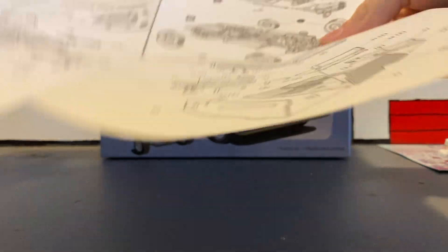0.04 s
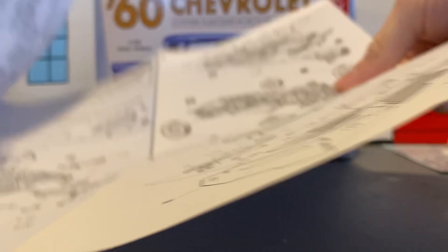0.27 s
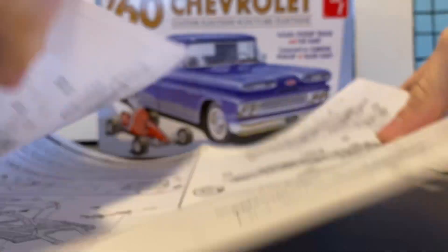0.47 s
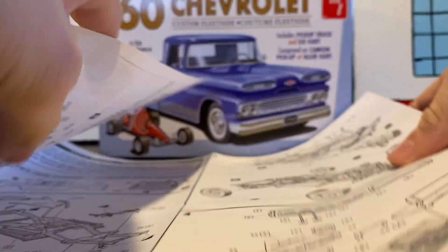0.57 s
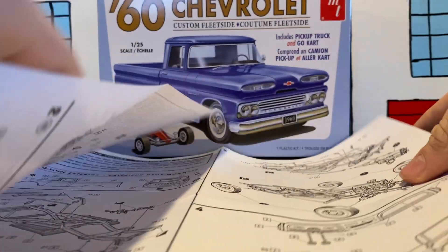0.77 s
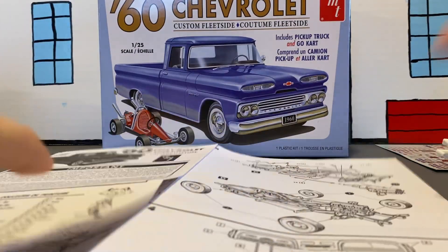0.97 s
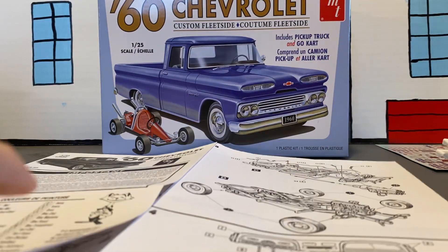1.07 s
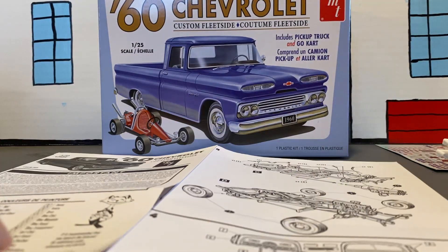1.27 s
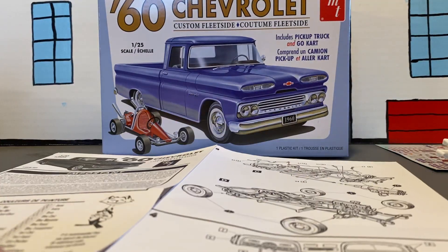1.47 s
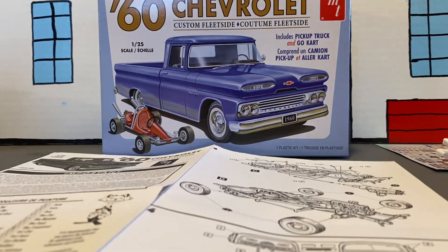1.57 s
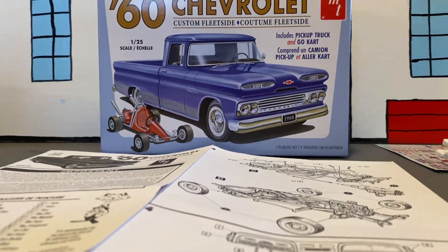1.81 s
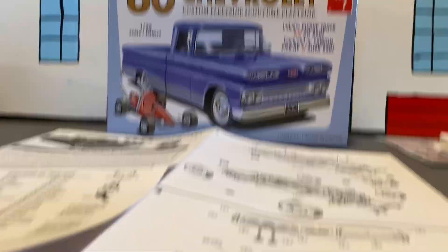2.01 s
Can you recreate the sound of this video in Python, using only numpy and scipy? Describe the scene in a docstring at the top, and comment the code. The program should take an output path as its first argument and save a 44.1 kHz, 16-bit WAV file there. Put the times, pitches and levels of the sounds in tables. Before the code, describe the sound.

Paper rustles and flaps loudly as it is opened and laid down, then settles with small crackles

```python
"""A folded paper sheet is opened by hand and laid on a table, close to the microphone, in a small room.
From the start its leaves hiss by stick-slip friction and flutter as wrinkles pop, over a quiet background;
leaves soon flap with dispersive thumps and slaps, then buckling patches snap as short decaying modes.
Bowed panels next sing gliding notes, and edges whip taut or strike the table with falling bending waves.
Later the crease ticks in tiny noise bursts as it is smoothed flat, among the last flaps and thumps."""
import sys
import numpy as np
from scipy import signal
from scipy.fft import rfft, irfft
from scipy.io import wavfile

SR = 44100
rng = np.random.default_rng(int(sys.argv[2]) if len(sys.argv) > 2 else 0)


def transcribe(signal):
    """Save signal, clipped to [-1, 1], as a 16-bit WAV file at the path in sys.argv[1]."""
    frames = np.atleast_2d(signal).T
    limited = np.clip(frames, -1, 1)
    pcm = np.round(limited * 32767).astype(np.int16)
    wavfile.write(sys.argv[1], SR, pcm)


N = 90404
TIME = np.arange(N) / SR
HZ = np.fft.rfftfreq(N, 1 / SR)
EDGE_HZ = 16300  # upper band limit


def amp(db):
    """Logarithmic level: decibels become an amplitude ratio."""
    return 10 ** (np.asarray(db) / 20)


def unit(x):
    """Normalization: the signal is scaled to rms 1."""
    return x / np.sqrt(np.mean(x ** 2) + 1e-20)


def read(points):
    """Spectral interpolation: a table over frequency is joined on a logarithmic axis."""
    hz, value = np.transpose(points)
    return np.interp(np.log(HZ + 1), np.log(hz + 1), value)


def level(points, axis=1):
    """Amplitude envelope: one dB column of a table over time becomes a gain."""
    rows = np.array(points)
    return amp(np.interp(TIME, rows[:, 0], rows[:, axis]))


def pan(db):
    """Interaural level difference: left and right gains, half the dB each way."""
    return amp(np.array([[.5], [-.5]]) * db)


def add(mix, start_s, sound):
    """Superposition: a stereo sound is added to the mix from a given time."""
    part = mix[:, max(round(start_s * SR), 0):][:, :sound.shape[1]]
    part += sound[:, :part.shape[1]]


def wander(size, hz):
    """Low-passed noise: a smooth random curve of rms 1, with hz as its corner frequency."""
    spectrum = rfft(rng.standard_normal(size))
    low_pass = 1 / (1 + (np.fft.rfftfreq(size, 1 / SR) / hz) ** 4)
    return unit(irfft(spectrum * low_pass, size))


def waver(hz, depth_db):
    """Random amplitude modulation: a soft-limited wander in dB becomes a gain of rms 1."""
    limited = 2 * np.tanh(wander(N, hz) / 2)
    return unit(amp(depth_db * limited))


def grains(per_s, spread_db, share):
    """Shot noise: two trains of uneven random impulses, whose power share is filled up by smooth noise."""
    size = amp(spread_db * np.minimum(rng.exponential(1, (2, N)), 4))
    sign = rng.choice([-1, 1], (2, N))
    occurs = rng.random((2, N)) < per_s / SR
    clicks = unit(size * sign * occurs)
    share = np.clip(share, 0, 1)
    return np.sqrt(share) * clicks + np.sqrt(1 - share) * rng.standard_normal((2, N))


# Likeness of the two microphone ports: (frequency [Hz], left-right correlation [0 to 1])
PORT_LIKENESS = [(60, 1), (150, 0.79), (300, 0.7), (700, 0.65), (1400, 0.25), (3000, 0.67), (6000, 0.57),
                 (9000, 1), (15000, 0.63)]
# Phase between the ports: (frequency [Hz], lead of the left port [rad])
PORT_PHASE = [(0, -0.5), (250, -0.17), (900, 1.54), (1800, 0.5), (3500, 0), (7400, 0.26), (8700, -3),
              (11600, -6.5), (15000, -11)]
# Balance at full lean: (frequency [Hz], left-right level difference [dB])
PORT_LEAN = [(60, 8), (200, 1.5), (700, 6.5), (1300, 2.5), (2300, 3), (4500, 5.5), (8000, 0.5),
             (16000, -0.5)]


def radiate(drive, colour, lean=0):
    """Partial coherence: two drives are coloured and made partly alike at the two ports, at rms 1."""
    first, second = rfft(drive)
    same = np.clip(read(PORT_LIKENESS), -1, 1)
    mid, side = first * np.sqrt(1 + same), second * np.sqrt(1 - same)
    right = (mid - side) * np.exp(-1j * read(PORT_PHASE))
    ports = np.array([mid + side, right])
    return unit(irfft(ports * amp(read(colour)) * pan(lean * read(PORT_LEAN)), N))


HAND_CENTRED_FROM_S = 1.51


def at_hand(drive, colour):
    """Source localization: level differences set the hand's sound on the left first, then in the middle."""
    left = TIME < HAND_CENTRED_FROM_S
    return np.where(left, radiate(drive, colour, lean=0.91), radiate(drive, colour))


# Leaves sliding over each other: (time [s], level before SLIDE_GAIN_DB [dB])
SLIDE_LEVEL = [(0, -57), (.03, -50), (.115, -49), (.135, -61), (.152, -51.5), (.19, -57), (.199, -44),
               (.222, -58), (.24, -48.5), (.262, -52.5), (.278, -48.5), (.295, -53.5), (.335, -49),
               (.352, -43), (.41, -40.5), (.432, -37.5), (.465, -43.5), (.65, -43.5), (.683, -40.5),
               (.703, -35.5), (.72, -44.5), (.75, -37), (.765, -42.5), (.84, -41), (.89, -44.5),
               (.925, -36.5), (.955, -57), (1.08, -61), (1.18, -65), (1.27, -58), (1.4, -58), (1.47, -55),
               (1.5, -50.5), (1.585, -60.5), (1.612, -49.5), (1.65, -44), (1.7, -57.5), (1.722, -46),
               (1.77, -68.5), (1.84, -65.5), (1.88, -54.5), (2.05, -59)]
# Relative spectrum of the hiss: (frequency [Hz], density [dB per Hz])
SLIDE_COLOUR = [(100, -66), (600, 5), (1300, -3), (2300, 5), (3300, 2.5), (5000, 1), (7500, 0.5),
                (10000, -3), (16000, -6)]
# Finest treble against the rest of the hiss: (time [s], relative level [dB])
FIZZ_LEVEL = [(0, -2.5), (.13, 0), (.25, 6), (.35, 4), (.48, -2.5), (.75, 2), (.92, -2.5), (1.02, 0),
              (1.35, -4.5), (1.52, -2), (1.61, 3), (1.66, -7.5), (1.9, -3.5), (2.05, 6.5)]
SLIDE_GAIN_DB, FIZZ_FROM_HZ = 2.5, 6000


def sliding():
    """Stick-slip friction: fibres catch and slip as paper rubs on paper; the fine fizz wavers on its own."""
    rub = grains(per_s=3500, spread_db=-1, share=1)
    coarse = irfft(rfft(rub) / (1 + (HZ / FIZZ_FROM_HZ) ** 8), N)
    fizz = (rub - coarse) * level(FIZZ_LEVEL) * waver(hz=54, depth_db=2.0)
    drive = coarse * waver(hz=100, depth_db=2.0) + fizz
    return amp(SLIDE_GAIN_DB) * level(SLIDE_LEVEL) * at_hand(drive, SLIDE_COLOUR)


# The sheet bending in the hands, levels before the two gains below:
# (time [s], flutter level [dB], level of the air it pushes [dB])
BEND_LEVELS = [(0, -44, -61), (.045, -56, -66), (.058, -40, -55), (.17, -46, -41), (.27, -44.5, -47.5),
               (.335, -45, -47), (.355, -33.5, -36), (.41, -41.5, -34), (.47, -42, -29), (.51, -33, -47),
               (.59, -45.5, -44), (.66, -45, -55), (.72, -33.5, -30), (.785, -43.5, -34), (.88, -48, -65),
               (.96, -43.5, -45), (1.02, -56, -38.5), (1.11, -70.5, -62), (1.26, -77, -70),
               (1.34, -61.5, -83), (1.53, -58.5, -53), (1.59, -52.5, -41.5), (1.64, -44.5, -44.5),
               (1.7, -51, -43), (1.76, -48.5, -45), (1.82, -64.5, -49), (1.86, -58, -70), (1.9, -60, -34.5),
               (1.97, -47.5, -49), (2.05, -87, -65)]
# Relative spectrum of the flutter: (frequency [Hz], density [dB per Hz])
FLUTTER_COLOUR = [(60, -26), (140, 2), (350, 1.5), (700, -3.5), (1100, -6.5), (1500, -10), (2200, -14.5),
                  (3200, -37), (6000, -69), (16000, -75)]
# Relative spectrum of the pushed air: (frequency [Hz], density [dB per Hz])
AIR_COLOUR = [(15, -57), (35, -26), (52, -7.5), (72, -0.5), (105, -7), (170, -15), (400, -35), (2000, -61)]
FLUTTER_GAIN_DB, AIR_GAIN_DB = -1.5, -3.5


def bending():
    """Impulsive and volume-flow radiation: wrinkles pop in the moving sheet, which also fans the air."""
    wrinkles = grains(per_s=900, spread_db=-1.5, share=0.94) * waver(hz=31, depth_db=3.0)
    flutter = amp(FLUTTER_GAIN_DB) * level(BEND_LEVELS) * at_hand(wrinkles, FLUTTER_COLOUR)
    pushed = radiate(rng.standard_normal((2, N)), AIR_COLOUR)
    return flutter + amp(AIR_GAIN_DB) * level(BEND_LEVELS, axis=2) * pushed


# Relative spectrum of the quiet background: (frequency [Hz], density [dB per Hz])
BACKGROUND_COLOUR = [(20, 7), (60, 4), (150, 20), (400, -42), (1200, 1), (2500, -10.5), (6000, -2),
                     (16000, -81)]
BACKGROUND_DB = -69.5


def background():
    """Stationary noise: a steady coloured random signal lies under the paper."""
    return amp(BACKGROUND_DB) * radiate(rng.standard_normal((2, N)), BACKGROUND_COLOUR)


# Leaves that flap or land: (time [s], thump level [dB], pitch the thump falls towards [Hz],
# slap level [dB], time until the slap fades [s], left-right difference of the slap [dB])
FLAPS = [(0.051, -59, 92, -42.5, 0.0094, 0), (0.209, -40.5, 99, -38.5, 0.0055, 2),
         (0.348, -46, 81, -45, 0.0066, 13), (0.388, -27, 57, -32, 0.017, 5),
         (0.444, -38, 76.6, -36.5, 0.0061, 7), (0.486, -47, 107, -32, 0.02, 9.5),
         (.628, -56, 101, -34, 0.011, 1.5), (0.693, -20.5, 71, -28.5, 0.022, 6),
         (0.738, -33, 69, -31, 0.0059, 9), (0.852, -33, 55.6, -33.5, 0.0046, 8),
         (0.922, -35, 59.3, -36, 0.0076, 9), (0.96, -32.5, 66.4, -48.5, 0.002, 21),
         (1.007, -39, 64, -55, 0.0025, 23), (1.2819, -38, 67, -38.5, 0.014, 9.5),
         (1.434, -43, 75, -64, 0.014, 10), (1.627, -42.5, 102, -42.5, 0.016, 3.5),
         (1.7233, -33, 104, -38, 0.0082, -0.5), (1.752, -36.5, 104, -50, 0.011, -8),
         (1.775, -42.5, 120, -59, 0.0038, -3), (1.879, -39.5, 78, -46, 0.0092, -4),
         (1.904, -42.5, 64, -50.5, 0.0048, 12), (1.96, -41, 51.4, -48.5, 0.0026, 11)]
# Relative spectrum of the slaps: (frequency [Hz], density [dB per Hz])
SLAP_COLOUR = [(60, 8), (180, -6.5), (400, 1), (750, -2), (1100, -8), (1500, -11), (2200, -5.5),
               (2900, -20.5), (4500, -27.5), (8000, -37.5), (16000, -33)]
SLAP_RISE_S, SLAP_FADE_S = 0.0015, 0.0061
THUMP_RISE_CYCLES, THUMP_FADE_CYCLES = 2.2, 1.11  # time constants in cycles of the table's pitch
THUMP_PAN_SHARE, THUMP_WANDER = .2, 0.26  # shares of the slap's left-right dB and of the pitch
GLIDE_HZ, GLIDE_S = 560.6, 0.004395  # height of the starting pitch above the last, time constant


def flaps():
    """Dispersion: bending waves arrive treble first, so each thump falls in pitch under a patter of contacts."""
    out, t = np.zeros((2, N)), np.arange(SR // 5) / SR
    patter = radiate(grains(per_s=2500, spread_db=3, share=0.83), SLAP_COLOUR)
    for start_s, thump_db, hz, slap_db, length_s, pan_db in FLAPS:
        swell = (1 - np.exp(-t * hz / THUMP_RISE_CYCLES)) * np.exp(-t * hz / THUMP_FADE_CYCLES)
        falling = hz + GLIDE_HZ * np.exp(-t / GLIDE_S)
        pitch = falling * (1 + THUMP_WANDER * wander(len(t), 2 * hz))
        thump = swell / swell.max() * np.sin(2 * np.pi * np.cumsum(pitch) / SR)
        add(out, start_s, amp(thump_db) * pan(THUMP_PAN_SHARE * pan_db) * thump)

        rise = np.clip((TIME - start_s) / SLAP_RISE_S, 0, 1)
        fade = np.exp(-np.maximum(TIME - start_s - length_s, 0) / SLAP_FADE_S)
        out += amp(slap_db) * pan(pan_db) * rise * fade * patter
    return out


# Buckling patches: (time [s], level before mode gains and envelope [dB], reference pitch [Hz],
# time to decay by 60 dB at full share [s], left-right difference [dB])
SNAPS = [(0.2081, -21, 2308, 0.025, 3.5), (0.3016, -26.5, 960, 0.019, -4), (0.3028, -30, 1595, 0.022, -2),
         (.3918, -26, 1000, 0.032, 6), (.3928, -21.5, 2150, 0.03, 2), (.479, -17.5, 2177, 0.036, 6),
         (.691, -28, 2640, 0.021, 6), (.7095, -27.5, 2200, 0.021, 14), (0.854, -24.5, 2500, 0.0063, -3),
         (1.004, -32.5, 2270, 0.015, 3), (1.531, -34.5, 1290, 0.0078, 0), (1.6113, -27, 1970, 0.014, 2),
         (1.6322, -32, 3040, 0.019, 10), (1.681, -30.5, 1800, 0.017, -2), (1.6922, -38, 1840, 0.013, -5),
         (1.724, -23, 1440, 0.0066, -10), (1.7238, -20.5, 3030, 0.0048, 12.5),
         (1.7401, -23.5, 1470, 0.0082, -4)]
# Modes of a patch: (multiple of the pitch [ratio], relative level [dB], share of the decay time [ratio])
SNAP_MODES = [(.47, -15.5, 0.52), (0.904, -13, 1), (0.999, -6.5, 1), (1.149, -14.5, 0.79),
              (1.41, -12.5, 0.56)]
SNAP_RISE_SHARE = .06  # rise time constant as a share of the table's decay time
SNAP_WANDER, SNAP_WANDER_HZ = 0.076, 1210  # the patch changes shape as it rings


def snaps():
    """Snap-through buckling: a curved patch flips over and its damped modes ring unsteadily."""
    out, t = np.zeros((2, N)), np.arange(SR // 10) / SR
    for start_s, db, hz, ring_s, pan_db in SNAPS:
        rise = 1 - np.exp(-t / (SNAP_RISE_SHARE * ring_s))
        for multiple, mode_db, share in SNAP_MODES:
            pitch = hz * multiple * (1 + SNAP_WANDER * wander(len(t), SNAP_WANDER_HZ))
            turns = np.cumsum(pitch) / SR + rng.random()
            phase = 2 * np.pi * turns + 0.5 * rng.standard_normal((2, 1))  # differs between the ports
            decay = np.exp(-np.log(1000) * t / (ring_s * share))
            add(out, start_s, 2 * amp(db + mode_db) * pan(pan_db) * rise * decay * np.sin(phase))
    return out


# Bowed panels that sing, pitches before the wander:
# (time [s], length [s], peak level before panning [dB], first pitch [Hz], last pitch [Hz])
WOBBLES = [(.383, 0.031, -28, 213, 160), (0.393, .045, -32.5, 389, 352), (.443, 0.058, -38.5, 556, 467),
           (0.481, .03, -37.5, 630, 734), (0.499, 0.024, -31.5, 308, 270), (0.692, 0.03, -33.5, 2543, 2280)]
WOBBLE_PAN_DB, WOBBLE_WANDER, WOBBLE_WANDER_HZ = 2, 0.046, 201


def wobbles():
    """Curvature-dependent resonance: a panel's note swells quickly and glides as the hands bend it."""
    out = np.zeros((2, N))
    for start_s, length_s, db, first_hz, last_hz in WOBBLES:
        unsteady = 1 + WOBBLE_WANDER * wander(SR // 2, WOBBLE_WANDER_HZ)
        progress = np.linspace(0, 1, round(length_s * SR))
        pitch = (first_hz + (last_hz - first_hz) * progress) * unsteady[:len(progress)]
        swell = np.sin(np.pi * np.sqrt(progress))
        ring = swell * np.sin(2 * np.pi * np.cumsum(pitch) / SR)
        add(out, start_s, amp(db) * pan(WOBBLE_PAN_DB) * ring)
    return out


# Edges jerked taut or striking the table:
# (time [s], level before the envelope [dB], starting pitch [Hz], left-right difference [dB])
WHIPS = [(0.6706, -23, 730, 3.5), (0.6897, -22, 1133, 3), (.8548, -25.5, 894, 4), (1.2801, -24, 923, 5.5),
         (1.88, -34.5, 790, 1), (1.963, -37, 758, 4)]
WHIP_END_HZ = 137
WHIP_GLIDE_S, WHIP_RISE_S, WHIP_FADE_S = 0.00374, 0.0028, 0.0089  # time constants


def whips():
    """Flexural wave propagation: a sharp bending wave runs through the sheet and drops from crack to thud."""
    out, t = np.zeros((2, N)), np.arange(SR // 10) / SR
    shape = (1 - np.exp(-t / WHIP_RISE_S)) * np.exp(-t / WHIP_FADE_S)
    for start_s, db, hz, pan_db in WHIPS:
        pitch = WHIP_END_HZ + (hz - WHIP_END_HZ) * np.exp(-t / WHIP_GLIDE_S)
        wave = shape * np.sin(2 * np.pi * np.cumsum(pitch) / SR)
        add(out, start_s, amp(db) * pan(pan_db) * wave)
    return out


# Fibres giving in the crease: (time [s], level before the decay [dB], tilt above the knee [dB per octave])
TICKS = [(1.1117, -40, 18), (1.4772, -28, 18), (1.4866, -33, -7.5), (1.6214, -30.5, -18),
         (1.6292, -31.5, -15), (1.682, -28.5, -7), (1.724, -26.5, -13), (1.8755, -35, -15)]
TICK_FADE_S, TICK_KNEE_HZ = .0008, 2280


def ticks():
    """Impulsive fracture: fibres give in the fold as tiny cracks of tilted, quickly decaying noise."""
    out, t = np.zeros((2, N)), np.arange(SR // 100) / SR
    hz = np.fft.rfftfreq(len(t), 1 / SR)
    octaves = np.log2(hz.clip(TICK_KNEE_HZ, EDGE_HZ) / EDGE_HZ)
    thin = np.sqrt(np.minimum(hz / TICK_KNEE_HZ, 1))  # weaker below the knee
    for start_s, db, tilt_db in TICKS:
        spectrum = rfft(rng.standard_normal((2, len(t)))) * thin * amp(tilt_db * octaves)
        crack = unit(irfft(spectrum, len(t)))
        add(out, start_s, amp(db) * crack * np.exp(-t / TICK_FADE_S))
    return out


ROOM_DB, ROOM_T60_S = -13, 0.14


def room(x):
    """Diffuse reverberation: a small room's echoes form noise that decays alike in bass and treble."""
    t = np.arange(SR // 2) / SR
    echoes = rng.standard_normal((2, len(t))) * (t > .004)  # none in the first 4 ms
    tail = echoes * np.exp(-np.log(1000) * t / ROOM_T60_S)
    return signal.fftconvolve(x, tail / np.linalg.norm(tail[0]), axes=1)[:, :N]


def scene():
    """Linear superposition: the paper, its room and the quiet background add up."""
    paper = sliding() + bending() + flaps() + snaps() + wobbles() + whips() + ticks()
    return paper + amp(ROOM_DB) * room(paper) + background()


def record(dry):
    """Band limitation: a linear-phase low-pass filter sets the recorder's upper edge."""
    low_pass = signal.firwin(511, EDGE_HZ, window=("kaiser", 9), fs=SR)
    return signal.oaconvolve(dry, low_pass[None], "same")


dry = scene()
out = record(dry)
transcribe(out)
```